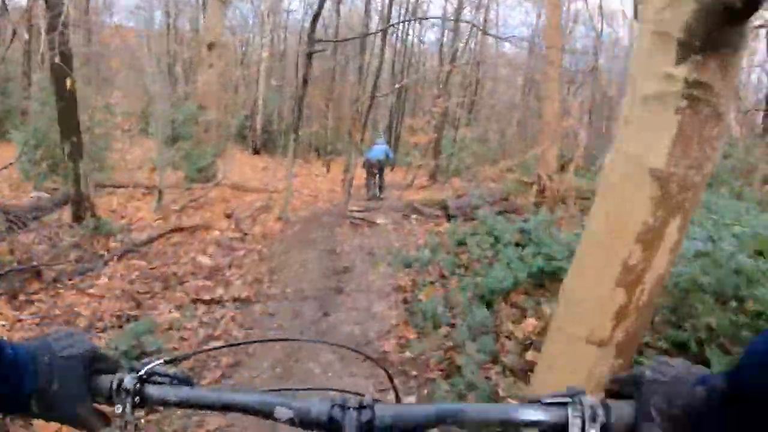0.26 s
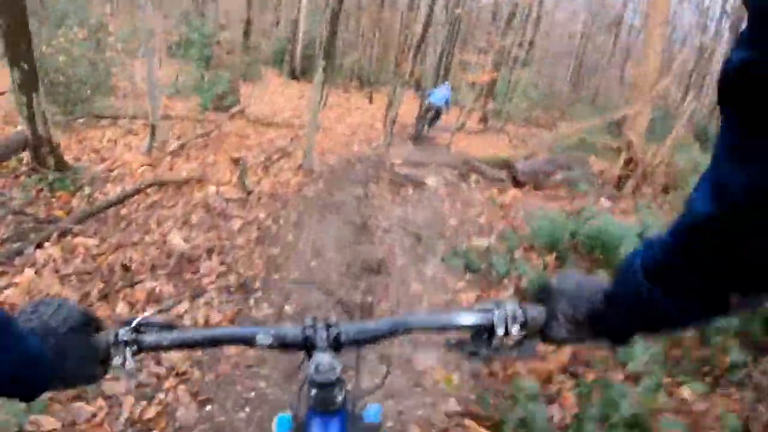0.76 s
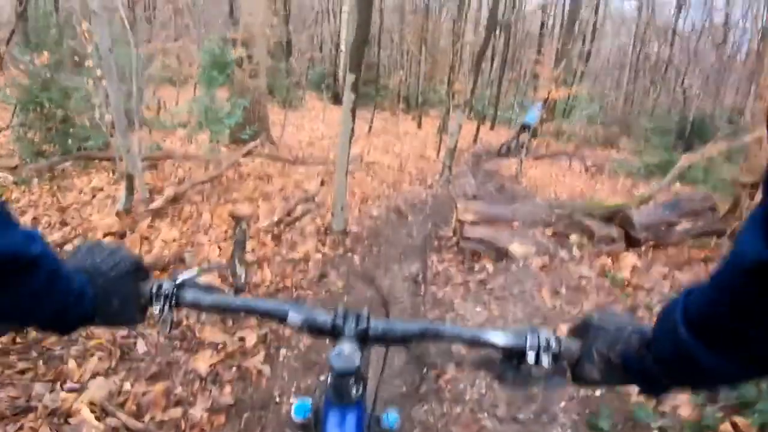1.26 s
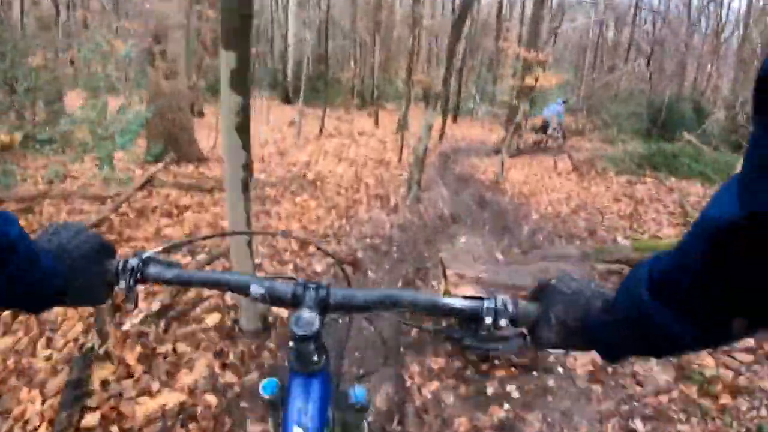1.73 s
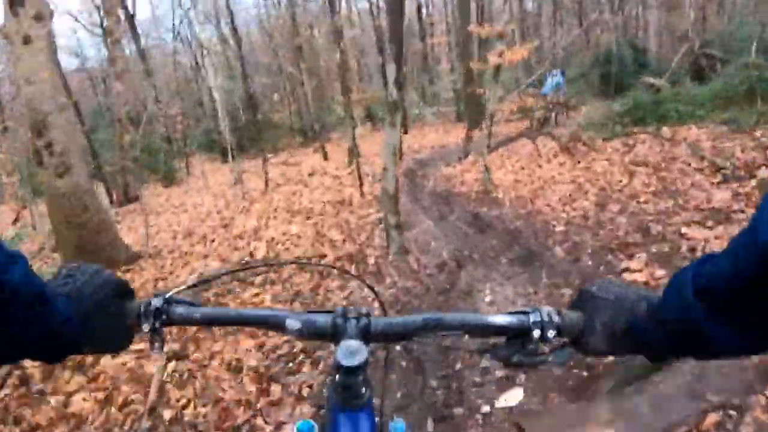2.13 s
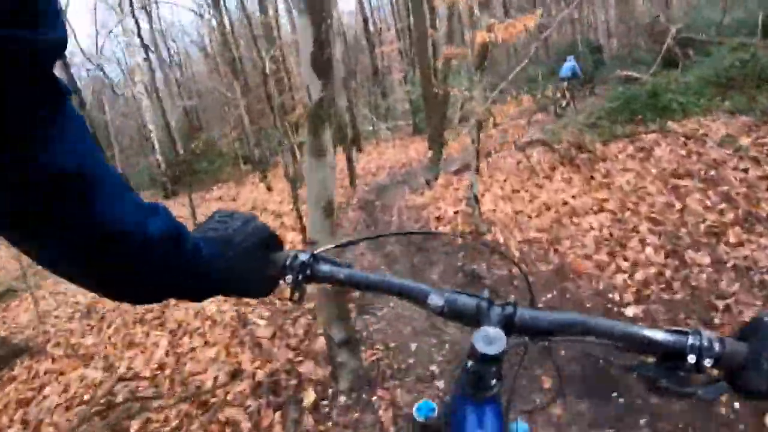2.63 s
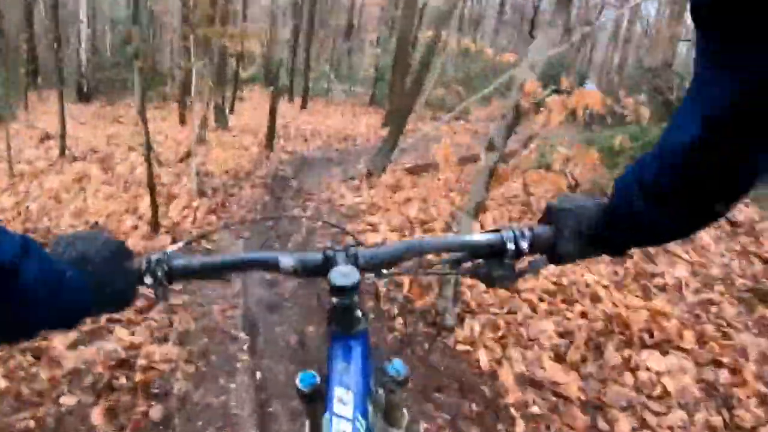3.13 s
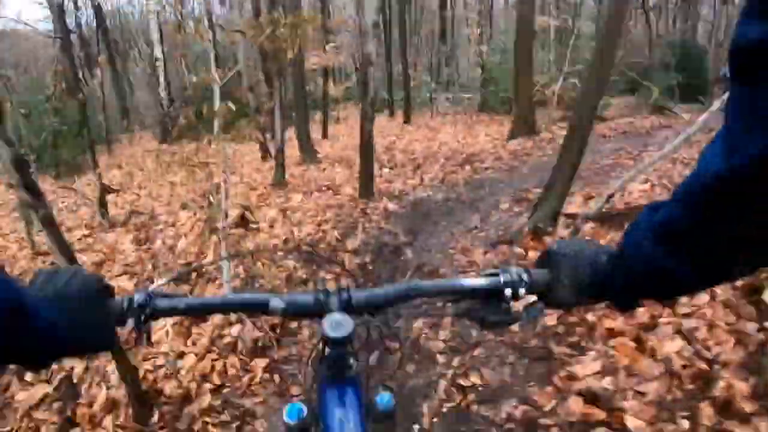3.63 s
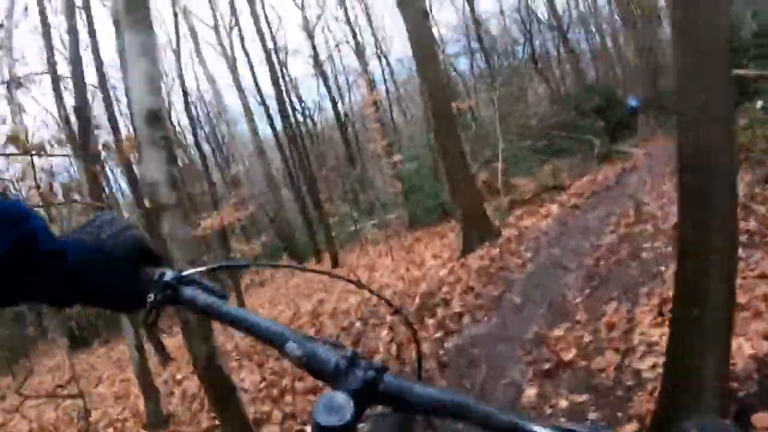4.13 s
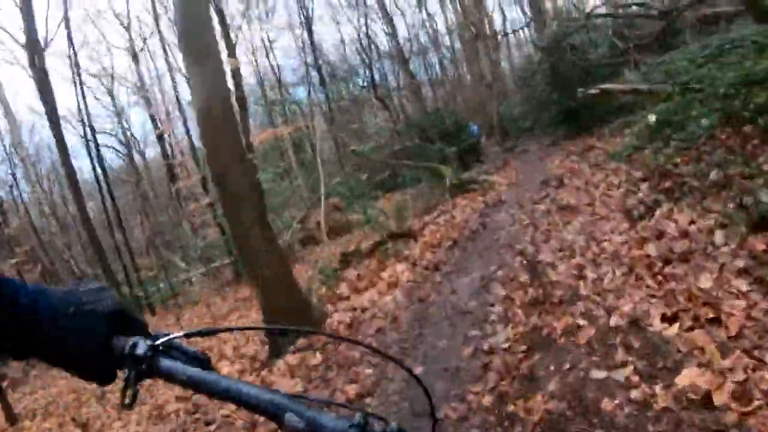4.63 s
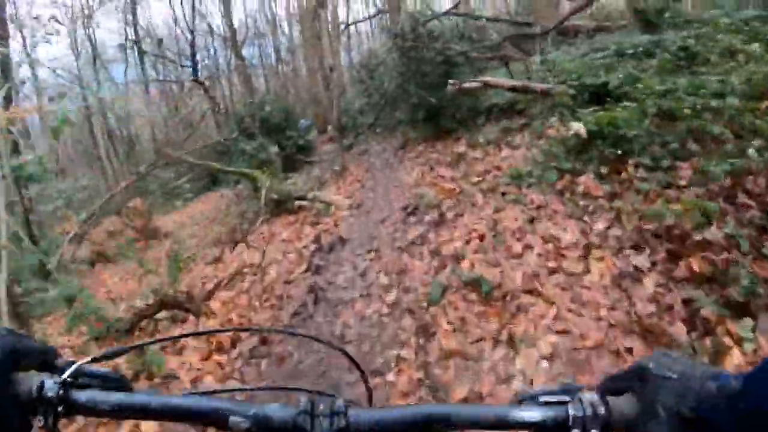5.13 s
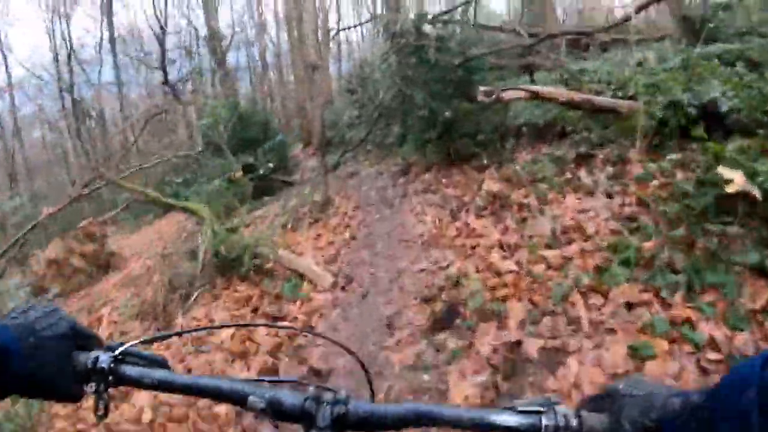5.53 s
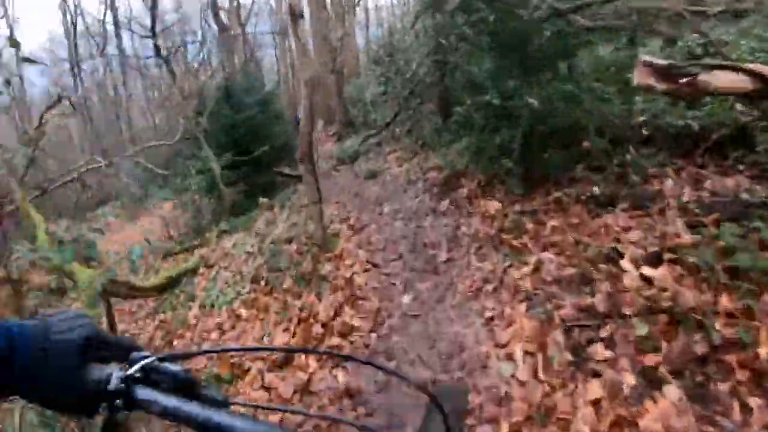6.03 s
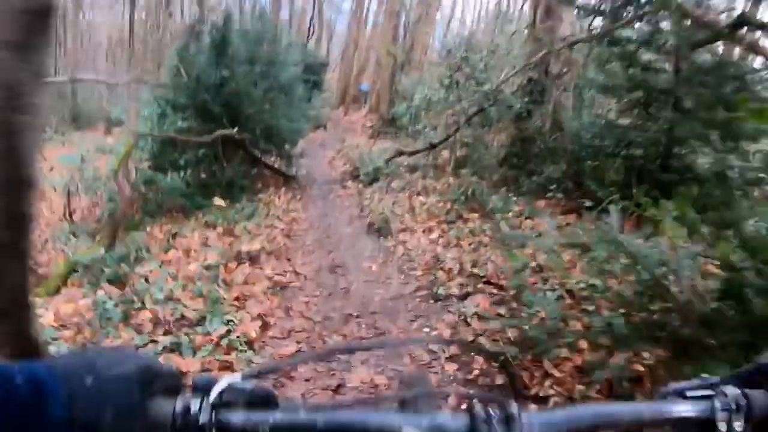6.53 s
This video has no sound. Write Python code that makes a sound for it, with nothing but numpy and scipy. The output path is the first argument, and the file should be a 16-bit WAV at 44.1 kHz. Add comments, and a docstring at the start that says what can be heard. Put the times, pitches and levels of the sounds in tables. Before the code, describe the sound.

A mountain bike rattles fast down a leafy dirt trail, wind buffeting the microphone, twigs snapping and handlebar mount knocking, then rolls on more quietly.

```python
"""A chest camera rides a mountain bike down a leafy trail. From the start, noise in short lumps buffets its
ports (wind), crumbly noise bands roll and hiss (tyres), and a faint sine hum comes and goes in the first second
or so. From 0.4 s banded bursts snap (twigs), short low sine cycles thump and impulses ring the mount's modes
(knocks), densest around 2 to 3.3 s; a swish of filtered noise dies away by 1.35 s. From 3.4 to 4.75 s the
camera fades from its stereo pair of ports to one sheltered mono port of another colour; after 4.5 s resonant
noise scrapes the ground."""
import sys
import numpy as np
from scipy import signal
from scipy.fft import rfft, irfft, next_fast_len
from scipy.io import wavfile
from scipy.ndimage import uniform_filter1d, map_coordinates

SR = 44100
rng = np.random.default_rng(int(sys.argv[2]) if len(sys.argv) > 2 else 0)


def bounce(signal):
    """Save signal as a 16-bit WAV file at the path given by the first command-line argument."""
    frames = np.transpose(np.atleast_2d(signal))
    limited = np.clip(frames, -1, 1)
    pcm = np.round(limited * 32767).astype(np.int16)
    wavfile.write(sys.argv[1], SR, pcm)


N = 298468

# Share of the stereo pair still heard. Each row: time in seconds, bass in dB, treble in dB.
PAIR_SHARE = [(0, -3.5, 1.5), (3.4, -2.5, 0), (3.6, -0.5, -7), (3.75, -1, -11.5), (3.9, -1.5, -22),
              (4.1, -10.5, -36), (4.4, -29, -50), (4.75, -71, -70), (6.77, -70, -70)]
# Wind, relative side level on the pair. Each row: time in seconds, level in dB.
WIND_SPREAD = [(0, 1), (.3, 0), (1.2, 3.5), (1.8, 2.5), (2.7, -1), (3, 4.5), (3.6, -3.5), (6.77, -6)]
# Airborne sound on the pair, side over mid. Each row: frequency in Hz, ratio in dB.
SIDE_OVER_MID = [(60, 4.5), (110, 6.5), (200, 13.5), (380, -0.5), (700, 5.5), (1290, 0.5), (2380, -4),
                 (4400, -13), (8120, 2.5), (15000, 1)]
# Mid-side likeness, positive to the left. Each row: frequency in Hz, likeness from -1 to 1.
LEAN = [(60, -0.59), (130, -1.3), (300, -0.88), (700, -0.42), (1300, 0.6), (2400, 0.14), (4400, .15),
        (8000, 0.18)]
# Left leading right. Each row: frequency in Hz, lead from -1 to 1.
LEAD = [(60, 0.35), (250, 0.92), (500, -1), (900, 0.98), (1500, 1), (1900, -.7), (3000, -0.82), (6000, 0.4),
        (8200, 1), (11000, 0)]

# Spectra, first through the pair, then through the single port.
# Each row: frequency in Hz, relative density in dB per Hz.
WIND_SPECTRA = ([(15, -62.5), (25, -6), (107, 1.5), (204, -12.5), (240, -9), (310, -34), (530, -120)],
                 [(15, -34), (25, -5), (48, 1.5), (112, -7), (145, -1), (320, -16.5), (420, -41),
                 (700, -120)])
ROLL_SPECTRA = ([(150, -24), (250, -6), (328, -7.5), (371, -17.5), (501, -4), (800, -31.5), (1040, -61),
                 (1760, -120)], [(150, -32), (250, -0.5), (280, -5), (345, 2), (620, -9), (800, -13.5),
                 (1040, -33), (1760, -120)])
TREAD_SPECTRA = ([(410, -66), (700, -2.5), (953, 2), (1190, -1.5), (1570, -1.5), (1790, -4.5), (2740, -2.5),
                  (3600, -14.5), (4680, -39), (7920, -120)], [(410, 7), (700, -4.5), (800, 1), (1110, -3),
                  (1390, 0), (1840, -4), (3200, -21.5), (4160, -50), (7040, -120)])
LEAVES_SPECTRA = ([(2900, -3.5), (3600, -1), (3910, -6.5), (4770, -7), (5970, -3.5), (7570, -3),
                  (8390, -11.5), (11300, -22), (12300, -50)], [(1880, -13), (3200, -10), (3340, -9.5),
                  (3890, -2), (4640, -4.5), (5360, -2.5), (7130, -16), (8760, -18), (11000, -35.5),
                  (14300, -67), (22000, -120)])
FIZZ_SPECTRA = ([(6760, -12), (11500, -8), (13100, -31), (15600, -34)], [(6590, -26), (11200, -28.5),
                 (11800, -3.5), (12500, 1.5), (13100, -2), (15600, -10.5)])
# Swish, one spectrum. Each row: frequency in Hz, relative density in dB per Hz.
SWISH_SPECTRUM = [(3300, -11), (3800, -5), (5400, -3), (6200, -17)]

# Steady buffeting of the ports. Each row: time in seconds, level in dB.
GUSTS = [(0.0, -53), (0.13, -40), (0.4, -34), (1.43, -34.5), (1.6, -34), (2.69, -29.5), (3.28, -28.5),
         (3.67, -38.5), (3.92, -37), (4.28, -49), (4.52, -48), (4.79, -42.5), (5.26, -50), (5.52, -48),
         (5.66, -45), (6.09, -39.5), (6.2, -35), (6.77, -36.5)]
# Single strong eddies. Each row: top in seconds, level in dB, length in seconds.
BUFFETS = [(0.11, -29, 0.021), (0.57, -27.5, 0.036), (0.68, -28.5, 0.032), (0.75, -30, 0.046),
           (0.88, -31, 0.035), (1.16, -25, 0.03), (1.22, -40, 0.056), (1.32, -26.5, 0.15),
           (1.44, -33.5, 0.042), (1.55, -29, 0.067), (1.66, -26.5, 0.02), (1.75, -34.5, .04),
           (1.83, -30, 0.018), (1.94, -27.5, 0.057), (2.26, -34.5, 0.076), (2.43, -28, 0.033),
           (2.56, -25, 0.058), (2.96, -24, 0.049), (3.11, -26, 0.033), (3.51, -33, 0.012),
           (3.62, -33.5, 0.023), (3.69, -33.5, 0.036), (4.01, -32.5, 0.033), (4.11, -35.5, 0.054),
           (4.6, -38, 0.1), (4.9, -26, 0.038), (5.01, -34, 0.047), (5.48, -38, 0.056), (5.67, -37.5, 0.038),
           (5.75, -38.5, .03), (6.08, -34.5, 0.11), (6.24, -29.5, 0.03), (6.52, -38, 0.023)]

# Steady tyre sound. Each row: time in seconds, tread in dB, leaves in dB, fizz in dB.
TYRE_BED = [(0, -63, -60, -74), (.24, -57.5, -58, -67), (.58, -52, -59.5, -71.5), (1.07, -49.5, -57, -69.5),
            (1.56, -51.5, -57.5, -77), (2.34, -49.5, -59.5, -77), (2.62, -51.5, -58, -79),
            (3.05, -50, -55.5, -70), (3.45, -56.5, -58.5, -83), (3.96, -53.5, -57.5, -79),
            (4.24, -51.5, -53.5, -63), (4.36, -53.5, -66, -77), (4.5, -48.5, -53.5, -65),
            (4.8, -57.5, -56, -70.5), (5.3, -54, -60, -72.5), (5.88, -56, -57, -70.5),
            (6.28, -59.5, -62.5, -77.5), (6.45, -55, -56.5, -70.5), (6.77, -54.5, -59, -73)]
# Steady casing roll. Each row: time in seconds, level in dB.
ROLL_BED = [(0, -54), (.36, -50), (.72, -49), (1.37, -40.5), (1.5, -49), (1.8, -47), (2.1, -46.5),
            (2.35, -50.5), (2.5, -48), (3.0, -42.5), (3.3, -47.5), (3.6, -46.5), (3.7, -58), (4.2, -64),
            (4.6, -47.5), (5.1, -56), (5.7, -52.5), (6.2, -57), (6.77, -45.5)]
# Hiss between tread and leaves. Each row: time in seconds, level in dB.
SWISH_BED = [(0, -77), (.3, -64), (1.2, -59), (1.35, -93), (6.77, -95)]
# Wheels plough a heap of leaves. Each row: top in seconds, leaves in dB, fizz in dB, length in seconds.
RUSTLES = [(0.711, -39, -52, 0.0067), (0.852, -65, -65, .02), (1.077, -56, -71, 0.035),
           (1.235, -55.5, -68, .04), (2.752, -60.5, -78, 0.11), (2.916, -56, -74, 0.044),
           (3.25, -48, -62, 0.04), (3.349, -57, -80, 0.015), (4.296, -49.5, -62, 0.072),
           (4.427, -50, -63, 0.078), (4.545, -56.5, -69, 0.054), (4.623, -56.5, -64, 0.072),
           (4.997, -56.5, -73, 0.1), (5.242, -56, -71, 0.046), (5.435, -56, -71, 0.095),
           (5.538, -49, -66, 0.021), (5.647, -58, -69.5, .06), (5.868, -63, -74, 0.091),
           (6.15, -57, -79, 0.058), (6.358, -53.5, -76, 0.051), (6.598, -56.5, -61, 0.1),
           (6.722, -54, -59, 0.021)]
# Tyre scuffs the ground. Each row: top in seconds, casing in dB, tread in dB, length in seconds.
SCUFFS = [(3.704, -57, -48, 0.028), (4.163, -46.5, -51.5, 0.033), (4.28, -57, -43, 0.012),
          (4.49, -52, -53, .04), (4.549, -48, -57, 0.052), (4.797, -43, -60, 0.019),
          (4.948, -58, -51, 0.14), (5.11, -52.5, -64, 0.045), (5.228, -53, -73, 0.043),
          (5.442, -57, -55.5, 0.14), (5.517, -43, -59, .03), (5.647, -58, -55, 0.061),
          (6.136, -49.5, -51.5, 0.05), (6.352, -51, -51, 0.17), (6.51, -42.5, -65, 0.035),
          (6.65, -52, -52, 0.035)]

# Blows on the mount. Each row: start in seconds, relative level in dB, hard edge over it in dB.
KNOCKS = [(0.516, -8.5, -27), (0.6655, -11.5, -35), (1.342, -9.5, -15), (1.536, -29, -1.5),
          (1.824, -38, -17), (1.916, -35, -7), (1.944, -26.5, -25), (2.047, -21, -30), (2.060, -15, -29),
          (2.072, -18.5, -32), (2.0867, -21.5, -30), (2.119, -23.5, -30), (2.208, -18.5, -30),
          (2.2414, -13, -34), (2.287, -25, -25), (2.301, -24, -25), (2.359, -17, -31), (2.413, -25, -30),
          (2.447, -25, -25), (2.462, -27, -30), (2.529, -20, -20), (2.557, -19, -30), (2.640, -30.5, -30),
          (2.946, -23, -25), (3.1146, -23, 9.5), (3.162, -14.5, -35.5), (3.24, -26, 2), (3.4488, -27.5, 0),
          (3.699, -28.5, -14)]
# Bouts of the loose mount. Each row: top in seconds, relative level in dB, length in seconds.
CHATTER = [(0.03, -40.5, 0.12), (0.51, -26, 0.03), (0.66, -25, 0.012), (0.86, -37, 0.016),
           (1.31, -24.5, 0.027), (1.83, -22.5, 0.04), (1.94, -26.5, 0.057), (2.085, -20.5, 0.03),
           (2.15, -23.5, .04), (2.225, -16.5, 0.033), (2.30, -29, 0.05), (2.39, -26.5, 0.042),
           (2.465, -28, 0.063), (2.545, -23.5, 0.044), (2.65, -30, 0.068), (2.79, -26.5, 0.045),
           (2.95, -24.5, 0.057), (3.19, -43, 0.016), (3.26, -26, 0.023)]
# Modes of the mount. Each row: frequency in Hz, width in Hz, left gain, right gain.
MOUNT_MODES = [(165, 21, -0.12, 0.063), (216, 56, -0.071, 0.22), (264.1, 22, 0.0052, 0.89),
               (496, 41, -0.14, -0.25), (568, 83, 0.031, -0.1), (677, 61, 0.12, -0.069),
               (907, 123, -0.045, 0.092)]
# Single low pushes. Each row: start in seconds, relative level in dB, frequency in Hz, # pan (positive to the
# left).
THUMPS = [(0.477, -17, 130, 0), (0.557, -19, 127, -12), (0.75, -21.5, 155, -10), (0.861, -16.5, 96, -4),
          (1.101, -17, 91.5, -6), (1.218, -18, 74, -6), (1.305, -10.5, 87, -3), (1.619, -21.5, 135, -8),
          (1.738, -19, 127, -14), (1.922, -15, 117, -4), (2.922, -20, 145, -10), (3.021, -17, 110, -13),
          (3.113, -12, 137, -16), (3.4995, -14.5, 126, -5), (3.669, -22.5, 150, -1.5),
          (3.992, -15.5, 135, 0), (4.578, -29, 60, 0), (4.821, -29.5, 110, 0), (5.5797, -23, 330, 0)]

# Twigs and leaves. Each row: start in seconds, relative level in dB, low band over it in dB,
# high band over it in dB, t60 in seconds, middle in Hz, low in Hz, high in Hz.
SNAPS = [(0.3817, -39, -22, -26, 0.15, 2600, 920, 6650), (0.501, -32.5, -4, -25, 0.047, 2650, 920, 6650),
         (0.7067, -25, -5, 4, 0.039, 2200, 1200, 7200), (0.7223, -29.5, 5.5, -18, 0.037, 3700, 1070, 6650),
         (0.727, -32, 4, -20, 0.024, 3500, 1100, 6650), (0.7316, -32, 0, -3, 0.044, 3900, 990, 6650),
         (0.740, -35, -1, -8, 0.067, 3300, 1500, 6650), (1.233, -39, 8, 0, 0.04, 2600, 920, 7800),
         (1.407, -39.5, -2, 3.5, 0.029, 2600, 920, 7200), (1.584, -35, -7, -17, 0.1, 2600, 920, 6650),
         (2.3905, -28.5, -6, -20, 0.014, 2600, 1500, 5500), (2.430, -24, -3, -7.5, 0.028, 3300, 1710, 5660),
         (2.565, -22, 3.5, -8.5, 0.031, 3240, 2270, 7200), (2.8067, -29, -24, -7.5, 0.11, 2370, 920, 6500),
         (2.945, -31, -4, -1.5, 0.11, 2660, 920, 6550), (3.114, -40.5, 20, -1, 0.039, 2300, 1250, 6650),
         (3.234, -30, -3, -16, 0.025, 2200, 1200, 6650), (3.237, -25, -8, 0, 0.032, 3000, 1500, 4800),
         (3.2427, -23, -8, 4, 0.017, 3200, 1500, 6750), (3.2478, -22.5, -2.5, -12, 0.027, 2470, 1400, 7500),
         (3.2562, -31, 11, -13, 0.03, 2780, 1030, 6650), (3.265, -29.5, -5, -18, 0.038, 2480, 1100, 6650),
         (3.277, -30, -12, -12, 0.077, 2400, 920, 7300), (3.430, -53, -7, 20.5, 0.02, 2600, 920, 6300),
         (3.494, -38, 0, -20, 0.11, 4100, 1290, 6650), (3.5076, -27, 5.5, -1, 0.015, 2900, 990, 4860),
         (4.2698, -39, 12, 0, 0.039, 4600, 1690, 6650), (4.271, -38.5, 11.5, -30, 0.072, 890, 510, 6650),
         (4.281, -31, -10, -30, 0.067, 755, 506, 6650), (4.7863, -45, 4, -13, 0.014, 4400, 1800, 6650),
         (4.8027, -35, 9, -12, 0.025, 4730, 1560, 6650), (5.093, -37, -8, -17, 0.022, 4300, 1600, 6650),
         (5.434, -42, -3, -17, 0.036, 4300, 1600, 6650), (5.5205, -40, 9.5, -24, 0.045, 3900, 1900, 6650),
         (5.522, -33, 10.5, -30, 0.034, 1400, 825, 6650), (5.542, -47, -3, -8, 0.03, 5300, 1900, 6650),
         (5.8607, -39, -3, -8, 0.059, 4300, 1300, 6650)]
# Resonance width over centre: middle, low and high band.
SNAP_SPANS = [0.53, 0.79, 0.3]
# Drags over the ground. Each row: top in seconds, level in dB, length in seconds, low in Hz, high in Hz,
# width over pitch.
SCRAPES = [(4.507, -43, .04, 342, 700, 0.43), (4.547, -39.5, 0.044, 353, 640, 0.47),
           (4.58, -54, .05, 4300, 5060, .12), (4.66, -59, .05, 4000, 5400, .12),
           (4.97, -57, 0.09, 1100, 1700, .35), (5.594, -52.5, .05, 950, 1660, 0.18),
           (5.655, -49, 0.057, 946, 1265, .13), (5.715, -55, .055, 930, 1440, 0.17)]
# Faint hum. Each row: top in seconds, relative level in dB, length in seconds.
HUM_SWELLS = [(.05, -49, .1), (.15, -49, .1), (.37, -52, .07), (.87, -45, .1), (.96, -44, .09),
              (1.06, -46, .08)]

TOP_HZ = 15780
FLUTTER_DB, FLUTTER_PER_S = 2.5, 14  # gust wobble
FADE_DB, RISE_SHARE = 13, 0.81  # a swell's loss one length after its top; rise length over fall length
IDLE_CHATTER_DB = -54  # relative, between bouts, while the pair is heard
ATTACK_SHARE = 0.028  # snap rise time constant over t60
CRISP_S = 0.025  # snaps with a longer t60 lose the click
CRACK_S, CRACK_SHARE = 0.0015, 0.8  # delay of the crack; its size over the whole burst


def amp(db):
    """Gain of a level in dB."""
    return 10 ** (np.asarray(db) / 20)


def unit(x):
    """x at rms 1."""
    return x / np.sqrt(np.mean(x ** 2) + 1e-20)


def along(points, hz):
    """(Hz, value) points on a log axis."""
    point_hz, values = np.transpose(points)
    return np.interp(np.log(hz + 1), np.log(point_hz + 1), values)


def curves(rows):
    """One value per sample for each column after the time."""
    time_s, *columns = np.transpose(rows)
    return [np.interp(np.arange(N) / SR, time_s, column) for column in columns]


def wobble(knots_per_s):
    """A smooth random curve."""
    knots = rng.standard_normal(int(N * knots_per_s / SR) + 4)
    return map_coordinates(knots, [np.arange(N) * knots_per_s / SR])


def swells(rows, under_db=-200):
    """Level in dB of a bed plus swells given as (top s, top dB, length s); powers add."""
    t = np.arange(N) / SR
    power = amp(under_db) ** 2 * np.ones(N)
    for top_s, db, length_s in rows:
        near = slice(max(round((top_s - .5) * SR), 0), round((top_s + .5) * SR))
        u = (t[near] - top_s) / length_s
        u = np.where(u < 0, u / RISE_SHARE, u)
        power[near] += amp(db - FADE_DB * u ** 2) ** 2
    return 10 * np.log10(power)


def filtered(x, response):
    """x times a complex response of frequency."""
    m = next_fast_len(N + SR // 2)
    return irfft(rfft(x, m) * response(np.fft.rfftfreq(m, 1 / SR)), m)[..., :N]


def resonance(f, hz, width_hz):
    """Causal response of one mode, 1 at its top."""
    return 1j * f * width_hz / (hz * hz - f * f + 1j * f * width_hz)


def coloured(x, spectrum):
    """x through a spectrum closed at both ends, at rms 1."""
    low_end = [(spectrum[0][0] * 0.99, -110)]
    high_end = [(spectrum[-1][0] * 1.5, -120)]
    shut = low_end + list(spectrum) + high_end
    return unit(filtered(x, lambda hz: amp(along(shut, hz))))


def crumbly(lump_db, lumps_per_s, grains_per_s, grain_db):
    """Two noises with shared lumps of level and scattered small decaying grains."""
    spikes = (rng.random(N) < grains_per_s / SR) * amp(grain_db + 3.1 * rng.standard_normal(N))
    lumps = amp(lump_db * wobble(lumps_per_s) + 3.13 * lump_db * wobble(lumps_per_s * 4))
    noise = lumps * rng.standard_normal((2, N))
    decay = amp(-60 * np.arange(600) / SR / 0.017)  # t60 of 17 ms
    return noise * (1 + signal.fftconvolve(spikes, decay)[:N])


def rest(share):
    """Gain that completes a share to unit power."""
    return np.sqrt(1 - share ** 2)


def ports(drive, spectra, pair_db, side_db=0):
    """Left and right: the pair hears mid and a partly related side; the single port takes over as it fades."""
    lean = lambda hz: np.clip(along(LEAN, hz), -.95, .95)
    lead = lambda hz: np.clip(along(LEAD, hz), -.95, .95)
    side_gain = lambda hz: amp(along(SIDE_OVER_MID, hz))
    wide = coloured(drive, spectra[0])
    mono = coloured(drive[1], spectra[1])
    related = filtered(wide[0], lambda hz: (lean(hz) + 1j * lead(hz) * rest(lean(hz))) * side_gain(hz))
    unrelated = filtered(wide[1], lambda hz: rest(lean(hz)) * rest(lead(hz)) * side_gain(hz))
    share = np.clip(amp(pair_db), 0, 1)
    mid = share * wide[0] + rest(share) * mono
    side = share * amp(side_db) * (related + unrelated)
    return mid + [[1], [-1]] * side


def wind():
    """Eddies burst on the ports in short lumps; their strength, evened over 1/12 s, follows the gusts."""
    eddies = amp([3.6 * wobble(30.23), 2.34 * wobble(22)]) * rng.standard_normal((2, N))
    pair = ports(eddies, WIND_SPECTRA, curves(PAIR_SHARE)[0], curves(WIND_SPREAD)[0] - 3)
    strength = np.sqrt(np.abs(uniform_filter1d(pair.mean(0) ** 2, SR // 12)) + 0.3)
    gust_db = swells(BUFFETS, curves(GUSTS)[0] + FLUTTER_DB * wobble(FLUTTER_PER_S))
    return amp(gust_db) * pair / strength


def tyres():
    """Casing roll, knobs on dirt and crushed leaves share the lumps of the ground."""
    tread_db, leaves_db, fizz_db = curves(TYRE_BED)
    leaves_db = swells([(s, db, length_s) for s, db, _, length_s in RUSTLES], leaves_db)
    fizz_db = swells([(s, db, length_s) for s, _, db, length_s in RUSTLES], fizz_db)
    tread_db = swells([(s, db, length_s) for s, _, db, length_s in SCUFFS], tread_db)
    bass_db, treble_db = curves(PAIR_SHARE)
    ground_db = .5 * wobble(14) + wobble(28)

    roll = amp(rolling_db() + .8 * ground_db) * ports(crumbly(1.2, 18, 9, -4), ROLL_SPECTRA, bass_db)
    tread = ports(crumbly(0.1, 9.5, 40, -0.29), TREAD_SPECTRA, treble_db)
    tread = amp(tread_db + 1.37 * ground_db) * tread
    leaves = ports(crumbly(0.24, 12, 40, -0.42), LEAVES_SPECTRA, treble_db)
    leaves = amp(leaves_db + 1.54 * ground_db) * leaves
    swish = coloured(crumbly(0.7, 35, 30, 5.8)[0], SWISH_SPECTRUM)
    swish = amp(curves(SWISH_BED)[0] + 0.49 * ground_db) * swish

    # fizz: separate noises left and right, swapped for the second spectrum
    drive = crumbly(0.58, 17, 22, -14)
    share = np.clip(amp(bass_db), 0, 1)
    fizz = share * coloured(drive, FIZZ_SPECTRA[0]) + rest(share) * coloured(drive[::-1], FIZZ_SPECTRA[1])
    return roll + tread + leaves + swish + amp(fizz_db + .7 * ground_db) * fizz


def rolling_db():
    """Level of the casing roll and its scuffs."""
    return swells([(s, db, length_s) for s, db, _, length_s in SCUFFS], curves(ROLL_BED)[0])


def thumps():
    """One or two soft cycles each; on the pair a strong pan moves the weaker side the other way."""
    out = np.zeros((2, N + SR))
    t = np.arange(SR // 10) / SR
    pair_s, pair_db, _ = np.transpose(PAIR_SHARE)
    for start_s, db, hz, pan in THUMPS:
        push = np.sin(2 * np.pi * hz * t) * t * hz * np.exp(1 - 1.6 * t * hz)
        side = np.tanh(pan / 6) * 4.2 * amp(np.interp(start_s, pair_s, pair_db))
        start = round(start_s * SR)
        out[:, start:start + len(t)] += amp(db - 2.0) * np.outer([1 + side, 1 - side], push)
    return out[:, :N]


def mount():
    """Blows and chatter ring the mount's modes; bending waves bring the treble first."""
    soft, hard = np.zeros(N), np.zeros(N)
    for start_s, db, edge_db in KNOCKS:
        soft[round(start_s * SR)] = amp(db + 56.5)
        hard[round(start_s * SR)] = amp(db + 61.5 + edge_db)

    taps = (rng.random(N) < 120 / SR) * amp(2.8 * rng.standard_normal(N)) * rng.choice([-1, 1], N)
    jolts = unit(unit(taps) + 0.38 * rng.standard_normal(N))
    chatter_db = swells(CHATTER, IDLE_CHATTER_DB + curves(PAIR_SHARE)[1])
    chatter = amp(chatter_db + 28) * jolts

    blunt = lambda f, hz: 1 / (1 + 1j * f / hz) ** 4
    push = filtered(soft + chatter, lambda f: blunt(f, hz=705))
    # a hard blow drives the upper modes
    edge = filtered(hard, lambda f: resonance(f, 675, 330) * blunt(f, hz=1810))
    modes = lambda f: sum(np.array([[left], [right]]) * resonance(f, hz, width_hz)
                          for hz, width_hz, left, right in MOUNT_MODES)
    bending = lambda f: np.exp(-2j * np.pi * 0.0058 * (2 * np.sqrt(266 * f) - .3 * f))
    return filtered(push + edge, lambda f: modes(f) * bending(f))


def snaps():
    """Each snap is a click and a ragged noise burst ringing three bands; partly related sides on the pair."""
    out = np.zeros((2, N + SR))
    t = np.arange(SR // 5) / SR
    f = np.fft.rfftfreq(len(t), 1 / SR)
    for start_s, db, low_db, high_db, t60_s, middle_hz, low_hz, high_hz in SNAPS:
        decay_s = max(t60_s, .005)
        crispness = 1 / (1 + (t60_s / CRISP_S) ** 4)
        shape = amp(-60 * t / decay_s) * (1 - np.exp(-t / (ATTACK_SHARE * decay_s)))
        shape = shape * (1 + 0.66 * crispness * np.exp(-((t - CRACK_S) / 0.00034) ** 2))  # the break
        ragged = amp(1.5 * np.repeat(rng.standard_normal(len(t) // 70 + 1), 70)[:len(t)])
        burst = shape * ragged * rng.standard_normal((3, 2, len(t)))
        # raggedness leaves the energy alone
        energy_root = np.linalg.norm(shape)
        burst = burst * energy_root / np.linalg.norm(burst, axis=-1, keepdims=True)
        burst[..., round(CRACK_S * SR)] += CRACK_SHARE * crispness * energy_root

        hz = np.array([middle_hz, low_hz, high_hz])[:, None, None]
        width_hz = hz * np.array(SNAP_SPANS)[:, None, None]
        gains = amp(db + np.array([0, low_db, high_db]))[:, None, None]
        bands = gains * resonance(f, hz, width_hz) ** 3 * np.sqrt(SR / width_hz)
        start = round(start_s * SR)
        out[:, start:start + len(t)] += irfft((rfft(burst) * bands).sum(0), len(t))
    mid, other = out[:, :N]
    side = amp(curves(PAIR_SHARE)[1]) * (0.16 * mid + 0.4 * other)  # a little to the left
    return amp(-9.5) * (mid + [[1], [-1]] * side)


def scrape():
    """Dense rubbing noise in two resonances."""
    out = np.zeros(N)
    for top_s, db, length_s, low_hz, high_hz, span in SCRAPES:
        low = lambda f: resonance(f, low_hz, span * low_hz) ** 2
        high = lambda f: resonance(f, high_hz, span * high_hz) ** 2
        rub = filtered(rng.standard_normal(N), lambda f: low(f) - 0.49 * high(f))
        out += amp(swells([(top_s, db, length_s)])) * unit(rub)
    return out


def hum():
    """A narrow, slightly unsteady low tone, stronger on the right."""
    cycles = np.cumsum(326 + 1.5 * wobble(8)) / SR
    tone = amp(swells(HUM_SWELLS) + .7 * wobble(10)) * np.sin(2 * np.pi * cycles)
    return tone * amp([[-1.5], [1.5]])


def scene():
    """Everything at the camera's ports."""
    return wind() + tyres() + thumps() + mount() + snaps() + scrape() + hum()


def record(dry):
    """The camera keeps nothing above its band limit."""
    return filtered(dry, lambda hz: hz < TOP_HZ)


dry = scene()
out = record(dry)
bounce(out)
```